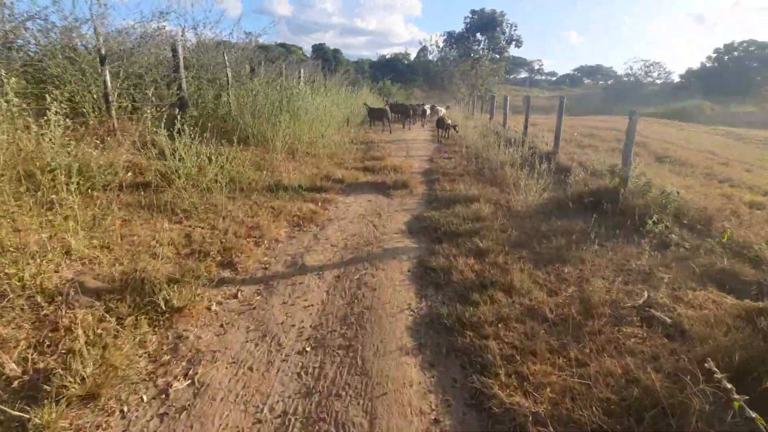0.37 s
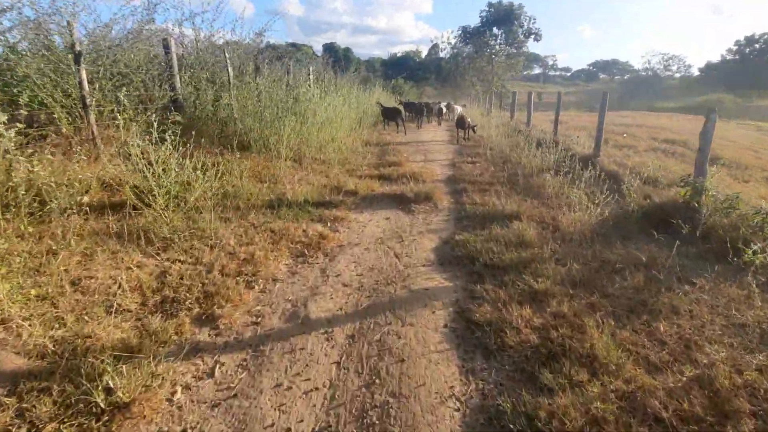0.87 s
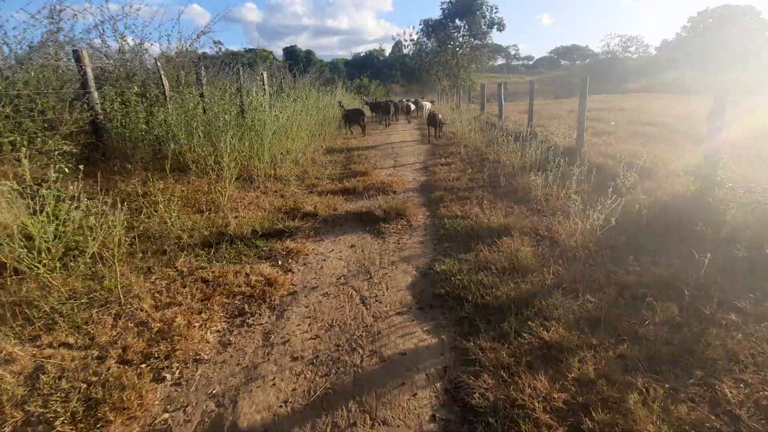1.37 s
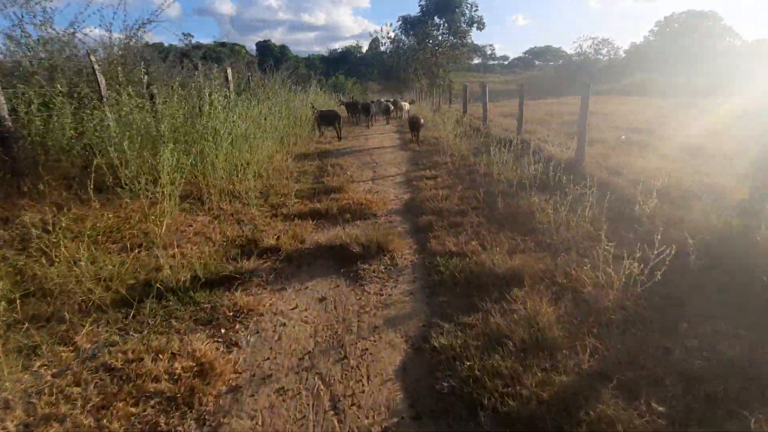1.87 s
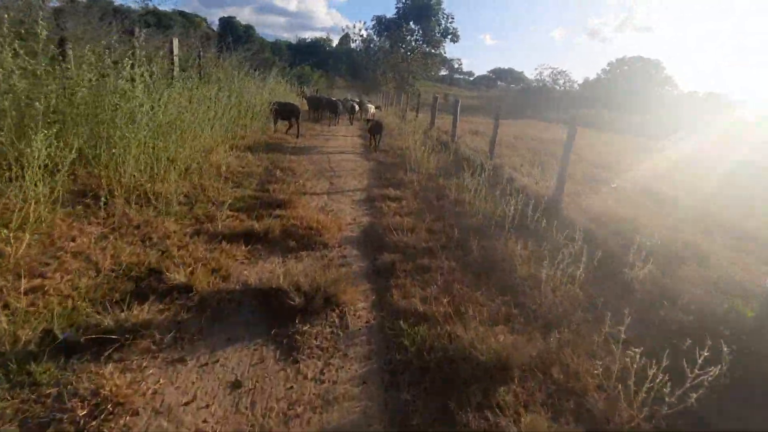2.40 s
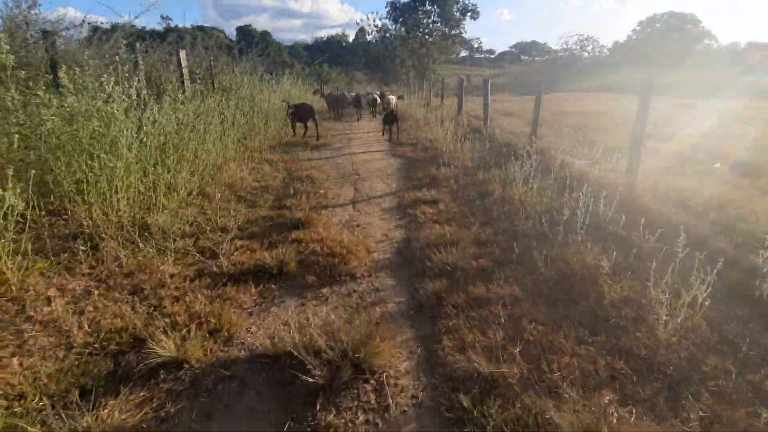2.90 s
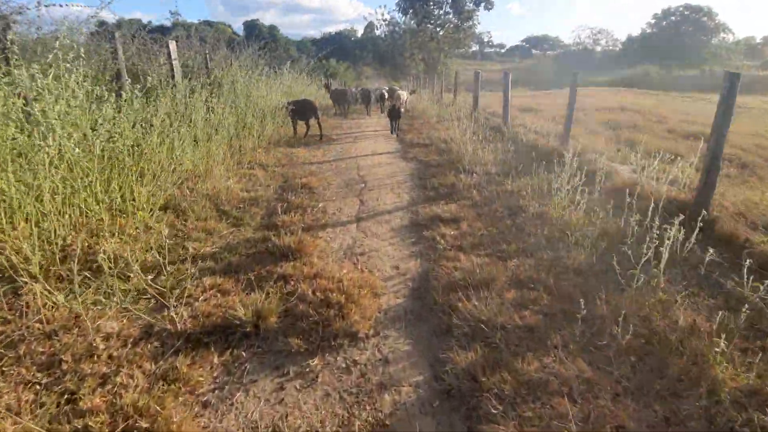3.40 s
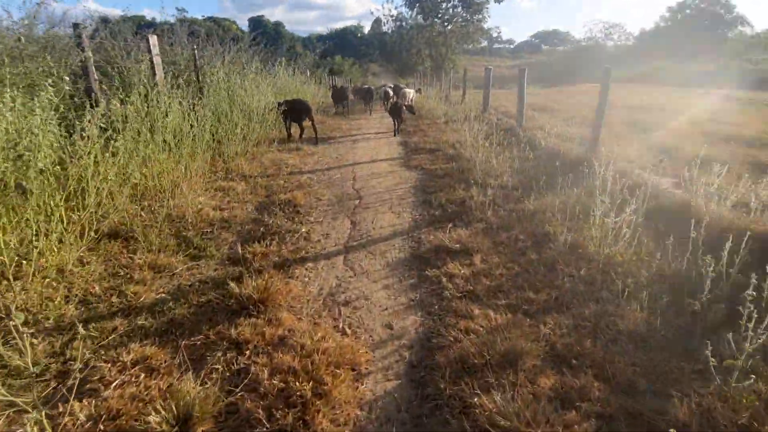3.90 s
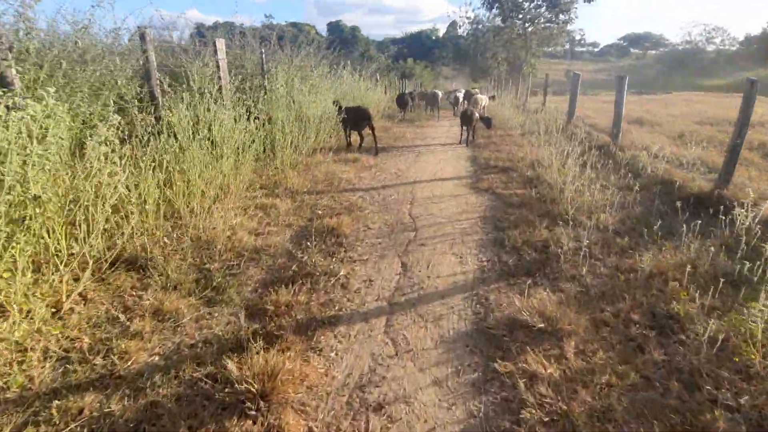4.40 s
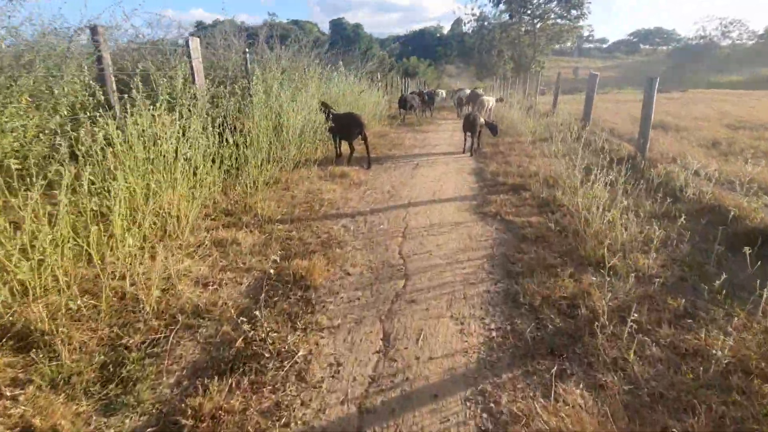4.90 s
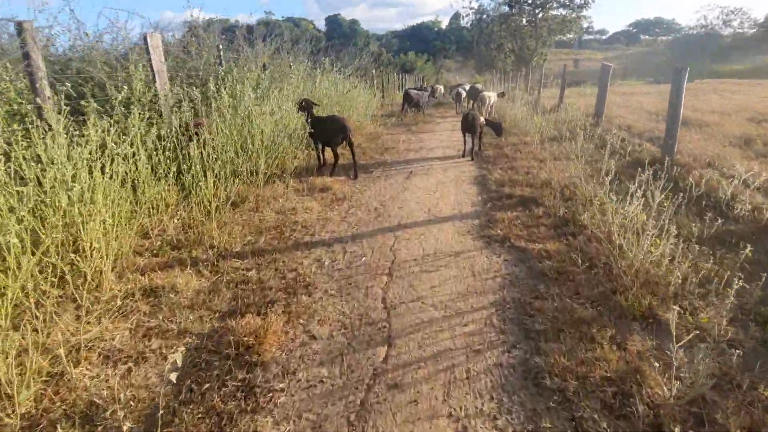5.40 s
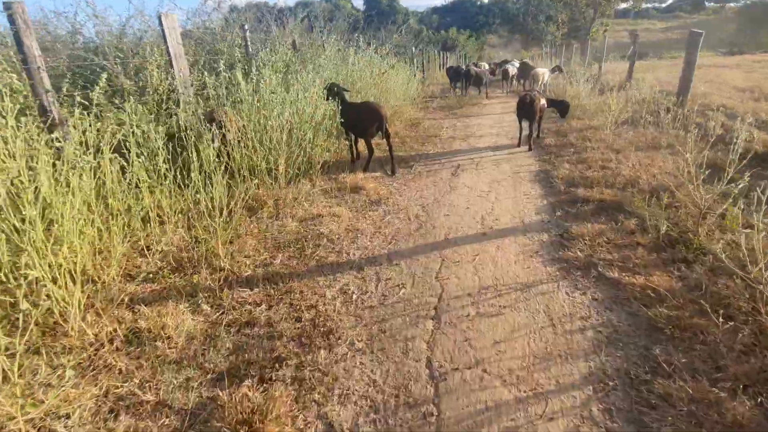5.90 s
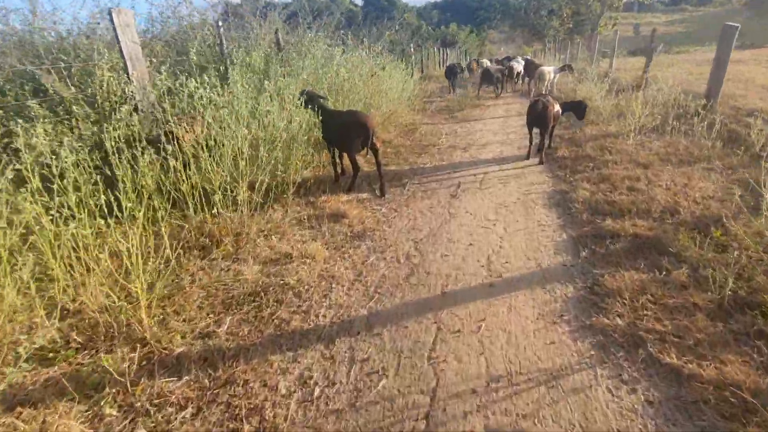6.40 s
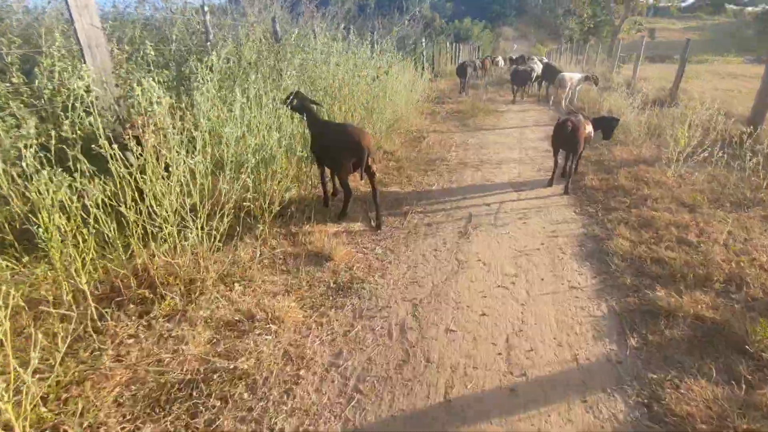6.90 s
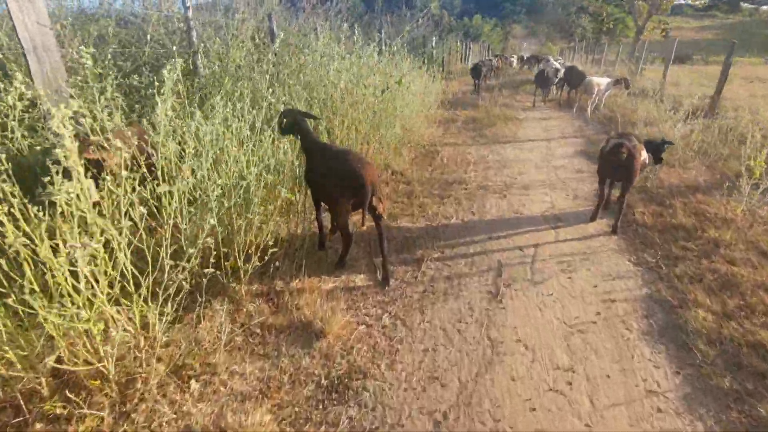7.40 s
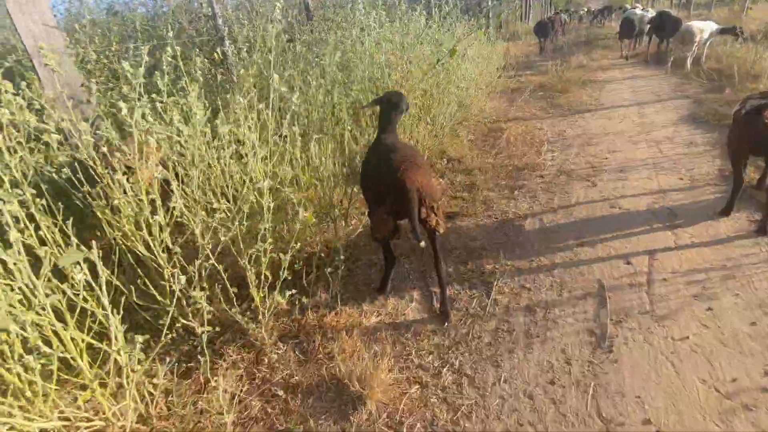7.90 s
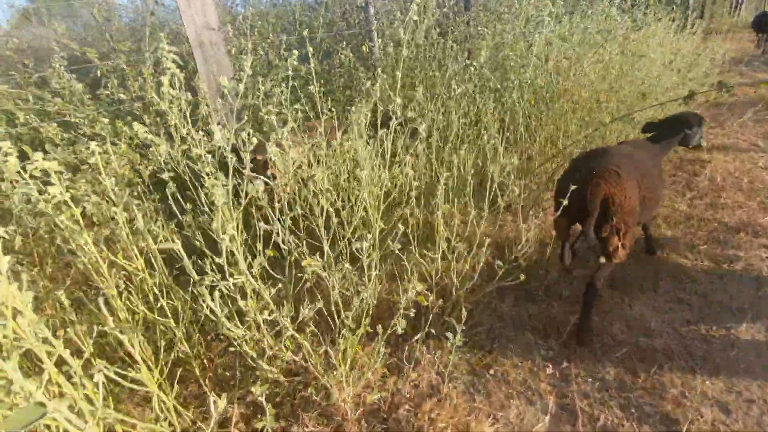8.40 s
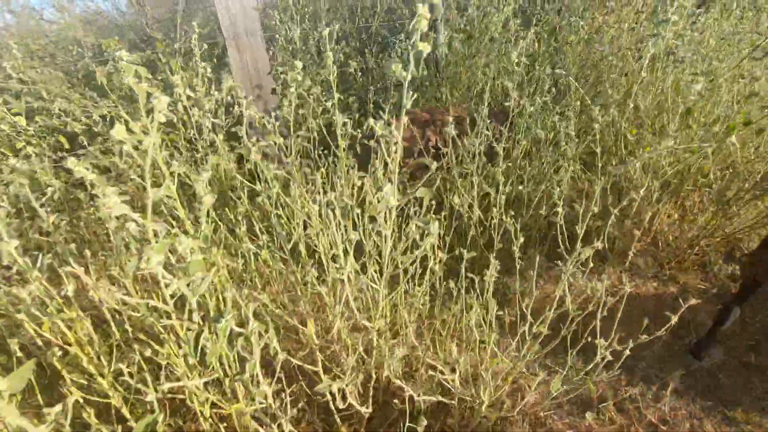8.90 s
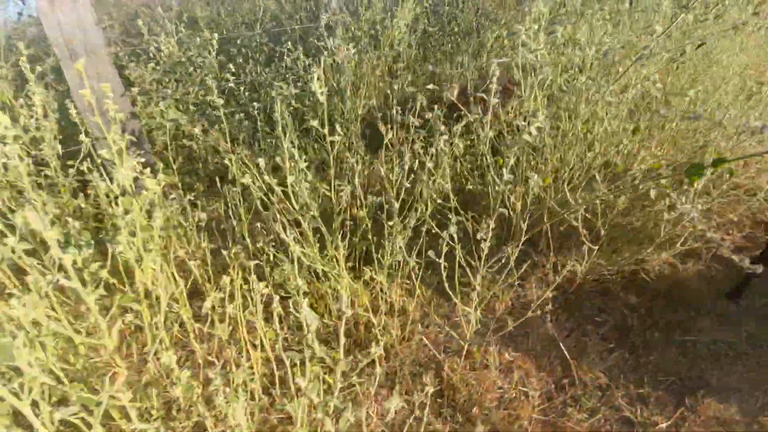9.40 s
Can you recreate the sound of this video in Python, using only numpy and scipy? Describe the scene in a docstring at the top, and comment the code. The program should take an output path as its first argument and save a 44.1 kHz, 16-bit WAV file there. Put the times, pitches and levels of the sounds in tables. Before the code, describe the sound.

Handheld outdoor sound with wind buffeting two unprotected microphones unevenly. Irregular gritty footsteps and dry stalk scrapes move over a quiet field background with high cricket chirps and trills. Thin metallic tinkles come from collar bells; a bird briefly sings amid faint twittering. The wind eases, steps become clearer with dull heel thuds, and finally close, bright crackling and snapping erupts as tall weeds are pushed through.

```python
"""A walker with a camera follows sheep down a dirt track, with two crickets (gliding tones) and a field hush (noise).
From the first second gusts buffet two microphone ports (swelling noise), soles crunch and stalks rustle (tiny rings
over noise), things snap (short noise bursts) and small collar bells tinkle (fading tones).
From 2 to 4.3 s far birds twitter, and near 3 s a bird on the right sings four notes (gliding tones).
Larger bells ring between 6.4 and 6.9 s; from 8.2 s tall weeds brush past and snap more thickly."""
import sys
import numpy as np
from scipy import signal
from scipy.fft import rfft, irfft, next_fast_len
from scipy.io import wavfile
from scipy.ndimage import uniform_filter1d, map_coordinates

SR = 44100
rng = np.random.default_rng(int(sys.argv[2]) if len(sys.argv) > 2 else 0)


def master_out(mix):
    """Clip the mix to full scale and print it as 16-bit PCM to the path in sys.argv[1]."""
    frames = np.transpose(np.atleast_2d(mix))
    ceiling = np.clip(frames, -1, 1)
    pcm = np.round(ceiling * 32767).astype(np.int16)
    wavfile.write(sys.argv[1], SR, pcm)


def gain_from_decibels(decibels):
    """Convert decibel values to linear amplitude factors."""
    exponent = np.asarray(decibels, float) / 20
    return 10 ** exponent


N = 420713  # samples in the scene


def unit(x):
    """Scales x to an average (rms) level of 1."""
    return x / np.sqrt(np.mean(x ** 2) + 1e-20)


def along(points, hz):
    """Reads a list of (frequency [Hz], value) points on a log frequency axis."""
    f, v = np.transpose(points)
    return np.interp(np.log(hz + 1), np.log(f + 1), v)


def curves(rows):
    """Draws a line through each column after the time, one value per sample."""
    s, *columns = np.transpose(rows)
    return [np.interp(np.arange(N) / SR, s, column) for column in columns]


def wobble(rate):
    """A smooth random curve with this many random knots a second."""
    knots = rng.standard_normal(int(N * rate / SR) + 4)
    return map_coordinates(knots, [np.arange(N) * rate / SR])


def bumps(times, half_s):
    """One smooth bump of height 1 around each time, as rows."""
    return np.exp(-((np.arange(N) / SR - np.c_[times]) / half_s) ** 2)


def coloured(x, spectrum):
    """Filters x by the given spectrum, then scales it to rms 1."""
    m = next_fast_len(N + 8192)
    gain = gain_from_decibels(along(spectrum, np.fft.rfftfreq(m, 1 / SR)))
    return unit(irfft(rfft(x, m) * gain, m)[..., :N])


# How alike sound from all around is at the two ports: (frequency [Hz], likeness [0 to 1])
LIKENESS = [(100, 0), (350, .8), (1400, .65), (3200, 0)]


def hush(spectrum):
    """Noise from all around, with a frequency-dependent likeness between the two ports."""
    m = next_fast_len(N)
    likeness = np.clip(along(LIKENESS, np.fft.rfftfreq(m, 1 / SR)), 0, 1)
    turn = np.arccos(likeness) / 2
    noise = rfft(rng.standard_normal((2, m)))
    mid, side = irfft(noise * [np.cos(turn), np.sin(turn)], m)[:, :N]
    return coloured(np.array([mid + side, mid - side]), spectrum)


def add(out, s, sound, lag=0, pan_db=0):
    """Adds a sound at time s; the left port hears it lag samples later, and pan_db louder than the right."""
    i = round(s * SR)
    for port, start, db in zip(out, (i + lag, i), (pan_db / 2, -pan_db / 2)):
        port[start:start + len(sound)] += gain_from_decibels(db) * sound[:N - start]


def note(length, start_hz, end_hz):
    """A pure tone that slides up into its pitch, holds, then bends toward its end pitch."""
    u = np.arange(round(length * SR)) / (length * SR)  # progress from 0 to 1
    slide = 1 - 0.148 * np.exp(-u / 0.0514)
    hz = start_hz * slide + (end_hz - start_hz) * u ** 4
    loudness = np.sqrt(np.sin(np.pi * u)) * (1 - u ** 2)
    return loudness * np.sin(2 * np.pi * np.cumsum(hz) / SR)


def grains(top_hz, cycles, spread_db, count):
    """Tiny breaks ring and die: equal mean energy, each with its own pitch, size and direction."""
    when, pitch, size, where = rng.random((count, 4)).T
    hz, k = top_hz * (pitch[:, None] + .05), np.arange(96)
    fade = np.exp(-k * hz / (SR * cycles))
    ring = np.sin(2 * np.pi * hz * k / SR) * fade * np.sqrt(hz)  # higher ones fade sooner, so start stronger
    ring *= gain_from_decibels(-spread_db * np.log(size + 0.0064))[:, None]  # a few are much louder than the rest
    start = (when * N).astype(int)[:, None] + k
    lag = (where * 20).astype(int)[:, None]
    ports = [(start + lag, 2 - where), (start + 10, 1 + where)]
    return np.array([np.bincount(i.ravel(), (ring * gain[:, None]).ravel(), N)[:N] for i, gain in ports])


def patchy(x, depth_db):
    """Changes the colour of x from moment to moment, alike at both ports, and returns it at rms 1."""
    z = signal.stft(x, nperseg=512)[2]
    field = rng.standard_normal(z.shape[1:])
    field = uniform_filter1d(uniform_filter1d(field, size=7, axis=0), size=6, axis=1)
    return unit(signal.istft(z * gain_from_decibels(depth_db * unit(field)), nperseg=512)[1][:, :N])


# Colour of crunching soil: (frequency [Hz], relative level [dB])
SOIL_COLOUR = [(150, -8), (300, -2.5), (1000, -7), (2500, -4.5), (5000, -18.5)]
# Colour of scraping dry stalks: (frequency [Hz], relative level [dB])
STALK_COLOUR = [(1500, -11), (3500, -3), (7500, -1.5), (9500, -7.5), (12500, -3.5)]
# Steady shuffling of feet and hooves: (time [s], soil level [dB], stalk level [dB])
SHUFFLE = [(0, -69.5, -73.5), (2, -65.5, -65.5), (3.5, -71.5, -71.5), (5.6, -70, -71), (7.1, -67.5, -72.5),
           (7.8, -72, -58.5), (9.54, -60, -55.5)]
# Steps on the track: (time of peak [s], soil level [dB], stalk level [dB])
TRACK_STEPS = [(.83, -56, -83), (1.162, -61.5, -81), (1.6, -60.5, -71.5), (2.03, -57, -64),
               (2.885, -62.5, -61.5), (3.312, -61.5, -86), (3.956, -58.5, -65), (4.32, -48, -52.5),
               (4.58, -60, -101), (4.975, -54.5, -53), (5.82, -60.5, -56.5), (6.225, -58, -69),
               (6.52, -60.5, -57), (7.55, -55, -57), (7.78, -52.5, -54)]
# Brushes through the tall weeds: (time of peak [s], soil level [dB], stalk level [dB])
WEED_BRUSHES = [(8.171, -74, -50), (8.222, -61, -54.5), (8.32, -50.5, -54), (8.41, -46, -87),
                (8.435, -50, -47), (8.515, -46.5, -47), (8.69, -54, -53.5), (8.755, -44, -42.5),
                (8.855, -89.5, -57), (8.99, -53, -48), (9.072, -59.5, -56), (9.155, -61.5, -48.5),
                (9.2, -49.5, -53.5), (9.405, -50.5, -46.5), (9.44, -50, -53.5), (9.518, -52.5, -45.5)]


def walk():
    """Grit shifts under the soles and stalks scrape, in clumps: grains over a blur of finer ones."""
    step_s, brush_s = 0.21, 0.065  # time to fall by 20 dB
    rise_share = 0.42  # the rise takes this share of the fall time
    power = gain_from_decibels(curves(SHUFFLE)) ** 2
    t = np.arange(-SR // 2, SR // 2) / SR
    for rows, fall_s in ((TRACK_STEPS, step_s), (WEED_BRUSHES, brush_s)):
        shape = gain_from_decibels(-20 * np.maximum(t, -t / rise_share) / fall_s) ** 2
        peaks = np.zeros((2, N))
        for s, *db in rows:
            peaks[:, round(s * SR)] = gain_from_decibels(db) ** 2
        power += np.abs(signal.fftconvolve(peaks, shape[None], "same", axes=1))
    soil_gain, stalk_gain = np.sqrt(power) * gain_from_decibels(1.4 * wobble(14))
    soil = .75 * coloured(grains(4500, 3, 3, count=6000), SOIL_COLOUR) + hush(SOIL_COLOUR)
    stalks = .6 * coloured(grains(15500, 4, 3, count=9000), STALK_COLOUR) + hush(STALK_COLOUR)
    crunch = soil_gain * gain_from_decibels(2.5 * wobble(30)) * patchy(soil, depth_db=3.0)
    rustle = stalk_gain * gain_from_decibels(2.2 * wobble(40)) * patchy(stalks, depth_db=1.5)
    return crunch + rustle


# Breaking stalks and clods: (time [s], level [dB], pitch [Hz])
BREAKS = [(1.1465, -39.5, 1210), (3.8694, -48, 4430), (5.7547, -45.5, 6950), (5.838, -37.5, 2260),
          (6.011, -41.5, 5700), (7.3884, -48, 4850), (7.924, -40, 5550), (8.39, -43, 1520),
          (8.466, -35, 14000), (8.514, -34.5, 2320), (8.6922, -36.5, 1160), (8.759, -33.5, 7450),
          (9.398, -29.5, 4580), (9.4804, -38.5, 7300)]
# Heels on packed earth: (time [s], level [dB])
HEELS = [(3.372, -43.5), (4.605, -44), (6.086, -43), (6.502, -45.5), (6.755, -47.5), (7.186, -41)]


def snaps():
    """A stalk, clod or the soil under a heel gives way: a noise burst around its pitch, different at each port."""
    out, t = np.zeros((2, N)), np.arange(2048) / SR
    burst = (1 - np.exp(-t / 0.00078)) * gain_from_decibels(-60 * t / 0.032)  # quick rise, 60 dB down in 32 ms
    heels = [(s, db, 330) for s, db in HEELS]  # heels thud around 330 Hz
    for s, db, hz in BREAKS + heels:
        band = signal.butter(2, [0.63 * hz, min(1.52 * hz, SR / 3)], "band", fs=SR)
        splinters = rng.standard_normal((3, len(t))) ** 3  # cubing makes the noise spiky
        shared, own = splinters[0], splinters[1:]
        left, right = unit(signal.lfilter(*band, shared + 0.44 * own))
        add(out[:1], s, gain_from_decibels(db - 3) * burst * left)
        add(out[1:], s, gain_from_decibels(db) * burst * right)
    return out


# Ringing tones of a small bell: (frequency [Hz], relative level [dB], time to fall by 60 dB [s])
BELL_TONES = [(1319, -5, .4), (3192, -5, .5), (5362, 0, .35), (5648, -7, .25), (8003, -6, .1),
              (8326, -5, .13), (9744, -10, .08)]
# Blows on the small bells: (time [s], level [dB], hardness [dB per octave])
BELL_BLOWS = [(0.3406, -56.5, -1), (0.4667, -58.5, -1), (1.1655, -54.5, 4), (1.2575, -63, -8.5),
              (1.5764, -53.5, 0), (1.883, -59, 1), (2.0703, -60, 6.5), (2.7947, -57.5, 0.5),
              (2.875, -55, 2), (3.052, -61.5, 2), (3.6814, -57.5, 2.5), (4.4673, -61, 3), (5.2835, -59, 0)]
# Larger bells: (time [s], level [dB], pitch [Hz])
LARGE_BELLS = [(6.39, -65.5, 1206), (6.518, -60, 1217), (6.879, -62.5, 1160)]


def bells():
    """A harder clapper blow favours the high tones, the highest of which lean right; the swinging bells waver."""
    out, t = np.zeros((2, N)), np.arange(SR // 4) / SR
    rise = 1 - np.exp(-t / 0.00043)
    for s, db, hard_db in BELL_BLOWS:
        for hz, level_db, t60 in BELL_TONES:
            tilt_db = hard_db * np.log2(hz / 4000)
            start_db = db + level_db + tilt_db + rng.normal(0, 2)
            ring = gain_from_decibels(start_db - 60 * t / t60) * np.sin(2 * np.pi * hz * t)
            add(out, s, rise * ring, lag=rng.integers(10), pan_db=-5 * (hz > 7000))
    for s, db, hz in LARGE_BELLS:
        add(out, s, rise * gain_from_decibels(db - 60 * t / 0.53) * np.sin(2 * np.pi * hz * t))
    return out * gain_from_decibels(2.2 * wobble(40))


# Gusts: (time [s], level [dB], lean to the left port [dB])
GUSTS = [(0, -54, 7), (.26, -63, -1), (.285, -41.5, 1.5), (1.15, -39.5, -6), (1.3, -55.5, -5),
         (1.58, -31.5, 6), (2, -29, -7.5), (2.1, -39, 2), (3.1, -40.5, -3.5), (3.25, -74.5, 4),
         (4.3, -62.5, 8), (5.7, -82.5, -4), (5.78, -37.5, -4.5), (6.24, -39.5, -4.5), (6.4, -72, 2),
         (7.4, -69, 6.5), (7.7, -36.5, -0.5), (7.93, -43, 9), (8.05, -97, 18), (8.2, -54.5, -3),
         (8.56, -46.5, -4.5), (8.65, -76, 5), (9.54, -61.5, -1.5)]
# Colour of the slow buffeting: (frequency [Hz], relative level [dB])
BUFFET_COLOUR = [(20, -40.5), (45, -3.5), (95, -2.5), (150, -10), (300, -51.5), (900, -120)]
# Colour of the fast flutter: (frequency [Hz], relative level [dB])
FLUTTER_COLOUR = [(80, -17.5), (170, 2), (320, -3.5), (500, -21.5), (2500, -100)]
# The big eddies, over the gust: (time [s], change at left [dB], change at right [dB])
BIG_EDDIES = [(0.422, 9, 10.5), (0.552, 9, 14), (1.022, 5, 9), (1.348, 6, 21), (1.685, 11.5, 15),
              (2.015, -7, 10), (2.305, 11.5, 11.5), (3.062, 11, 10.5), (6.228, 1, 4.5), (7.796, 11.5, 11.5)]
# Moments when the flow leaves a port: (left times [s]), (right times [s])
PORT_LULLS = ([1.27, 1.4, 5.79, 6.12, 8.42], [.918, 1.307, 2.12, 2.23, 2.639, 2.918, 2.993, 6.061, 7.742,
              7.89, 8.36])


def wind():
    """Eddies roll over each port on their own; the stronger the gust, the more fast flutter rides on it."""
    eddy_s, lull_s, lull_db = 0.031, 0.035, -18.5  # half widths of the bumps, depth of a lull
    strength_db, lean_db = curves(GUSTS)
    s, *over_db = np.transpose(BIG_EDDIES)
    port_db = strength_db + np.outer([.5, -.5], lean_db)
    port_db += over_db @ bumps(s, eddy_s)
    port_db += lull_db * np.array([bumps(times, lull_s).sum(axis=0) for times in PORT_LULLS])
    port_db += 2.5 * np.array([wobble(14), wobble(14)])
    buffet = gain_from_decibels(port_db) * coloured(rng.standard_normal((2, N)), BUFFET_COLOUR)
    flicker_db = 3 * np.array([wobble(30), wobble(30)])
    flutter_db = 1.518 * port_db + 5.0 + flicker_db  # grows faster than the buffeting
    return buffet + gain_from_decibels(flutter_db) * coloured(rng.standard_normal((2, N)), FLUTTER_COLOUR)


# Bird notes: (time [s], length [s], end pitch [Hz], level [dB])
BIRD_NOTES = [(2.986, 0.074, 3400, -62), (3.305, 0.066, 3150, -52.5), (3.53, 0.046, 2720, -59.5),
              (3.625, 0.058, 3100, -54)]


def bird():
    """A bird on the right sings pure notes that bend down from one shared pitch."""
    out = np.zeros((2, N))
    for s, length, end_hz, db in BIRD_NOTES:
        add(out, s, gain_from_decibels(db) * note(length, 3570, end_hz), pan_db=-5)
    return out


# Loudness of the two crickets: (time [s], chirper level [dB], triller level [dB])
CRICKET_LEVELS = [(0, -64, -67.5), (.9, -66.5, -59.5), (2, -52, -73), (2.6, -67, -64), (5.7, -68.5, -116),
                  (9.54, -76, -81)]


def crickets():
    """On the left one cricket chirps four strokes at a time and another trills; each stroke is a short tone."""
    chirps, trill = np.zeros((2, 2, N))
    for s in np.arange(.171, N / SR, .2494):
        for k in range(4):
            stroke = gain_from_decibels(rng.normal(-k, 4.5)) * note(0.031, 7380, 7000)
            add(chirps, s + .036 * k, stroke, lag=2, pan_db=4.5)
    for s in np.arange(0, N / SR, 1 / 32.7):  # 32.7 strokes a second
        hz = 5960 if s < .36 else 6160
        add(trill, s, gain_from_decibels(rng.normal(0, 2)) * note(.017, hz, hz), lag=2, pan_db=6)
    chirper_db, triller_db = curves(CRICKET_LEVELS)
    return gain_from_decibels(chirper_db) * chirps + gain_from_decibels(triller_db) * trill


def twitter():
    """Far birds scatter short faint sweeps for a while, many of them down in pitch."""
    level_db, pitch_hz = -67, 3300
    out = np.zeros((2, N))
    for when, start, end in rng.random((40, 3)):
        sweep = note(.022, pitch_hz * (.8 + .3 * start), pitch_hz * (.5 + .6 * end))
        add(out, 2 + when * 2.3, gain_from_decibels(level_db) * sweep, pan_db=-5)
    return out


# Colour of the fields: (frequency [Hz], relative level [dB])
FIELD_COLOUR = [(25, -21.5), (42, -17), (215, -11), (311, 4.5), (1520, -17.5), (3110, 2), (4500, -8.5),
                (6210, -0.5), (9450, -16.5), (15500, -25)]


def fields():
    """The steady hush of the fields: soft coloured noise from all around."""
    return gain_from_decibels(-69.0) * hush(FIELD_COLOUR)


def scene():
    """Adds up all the sources at the two ports."""
    left, right = walk() + snaps() + fields()
    ground = np.array([left, np.roll(right, 5)])  # right is 5 samples late: most comes from the left of the track
    return wind() + ground + bells() + bird() + crickets() + twitter()


def low_pass(x):
    """Removes everything above the highest recorded frequency."""
    return signal.sosfilt(signal.butter(12, 16560, fs=SR, output="sos"), x)


def record(dry):
    """The camera keeps nothing above its band limit of 15840 Hz."""
    m = next_fast_len(N)
    kept = np.fft.rfftfreq(m, 1 / SR) < 15840
    mix = irfft(rfft(dry, m) * kept, m)[:, :N]
    return low_pass(mix)


dry = scene()
out = record(dry)
master_out(out)
```